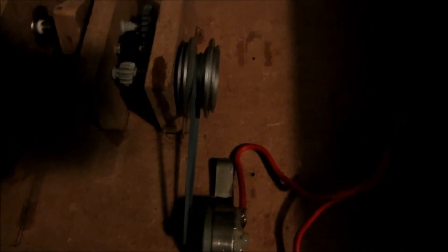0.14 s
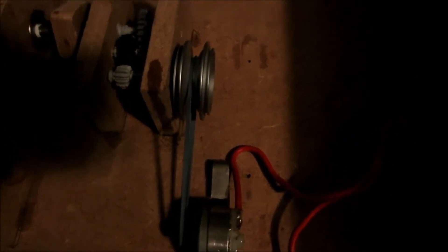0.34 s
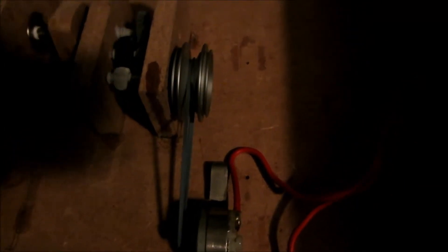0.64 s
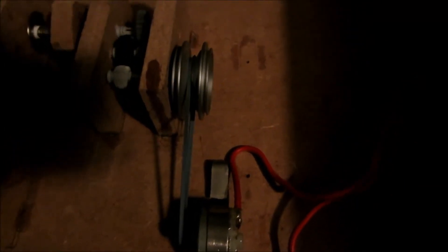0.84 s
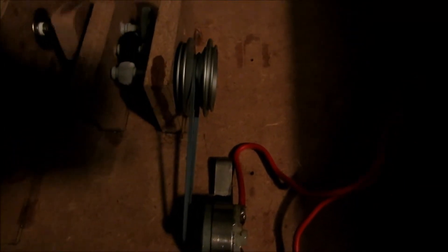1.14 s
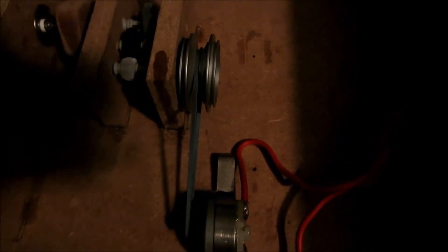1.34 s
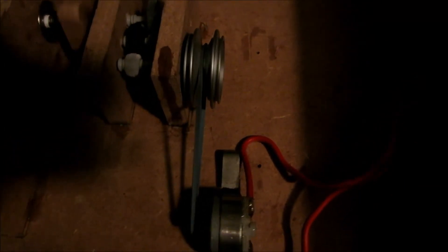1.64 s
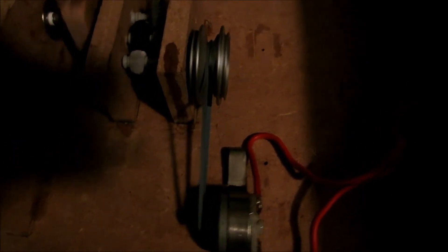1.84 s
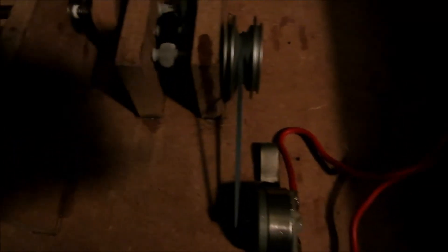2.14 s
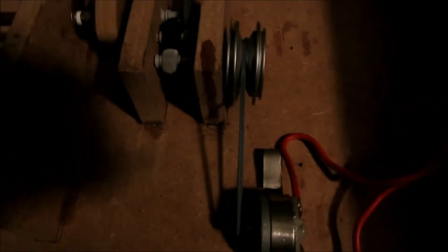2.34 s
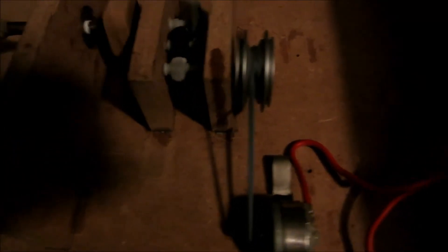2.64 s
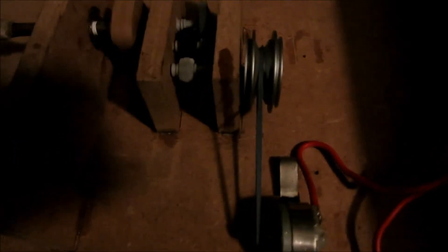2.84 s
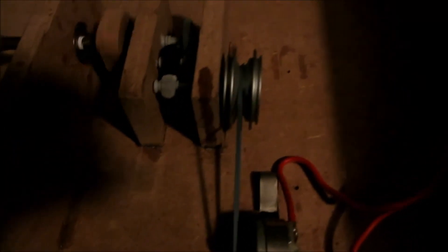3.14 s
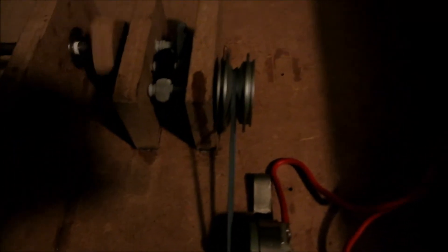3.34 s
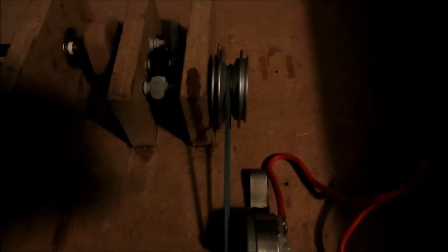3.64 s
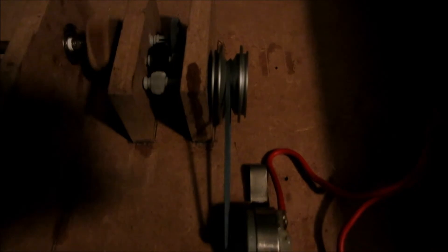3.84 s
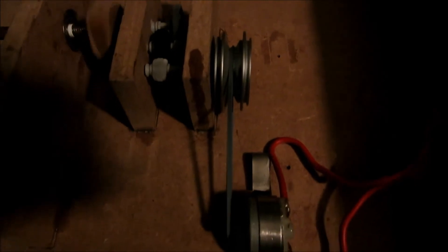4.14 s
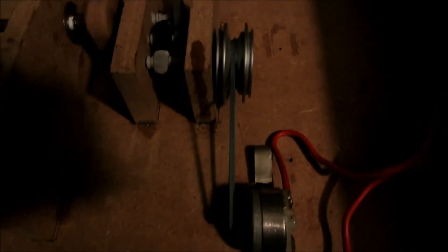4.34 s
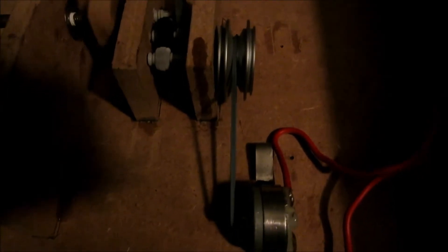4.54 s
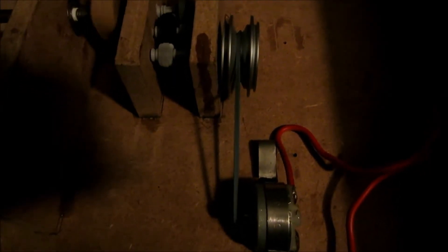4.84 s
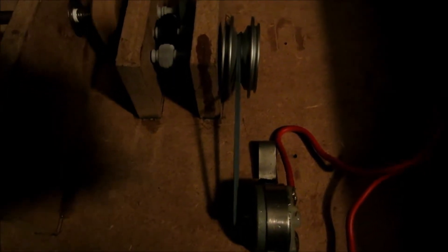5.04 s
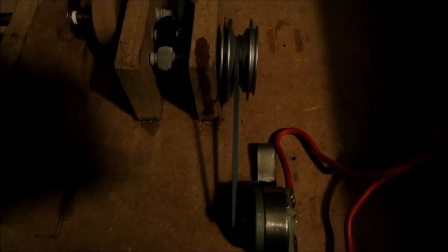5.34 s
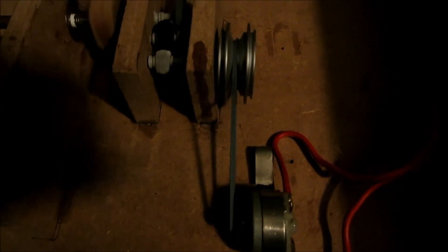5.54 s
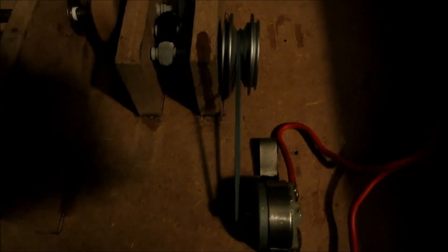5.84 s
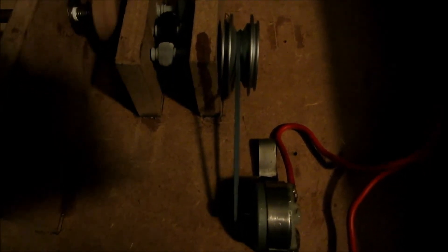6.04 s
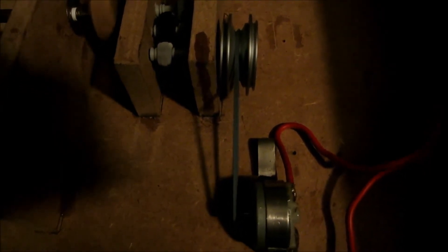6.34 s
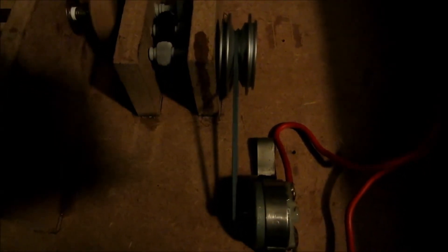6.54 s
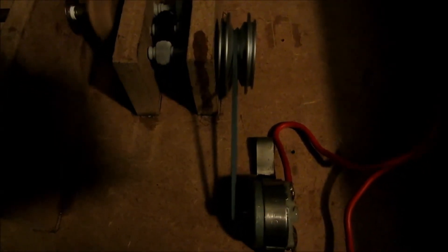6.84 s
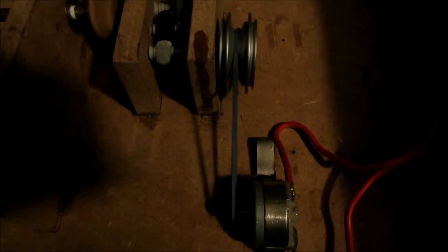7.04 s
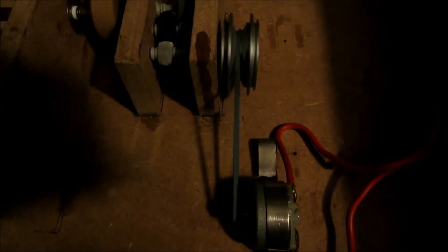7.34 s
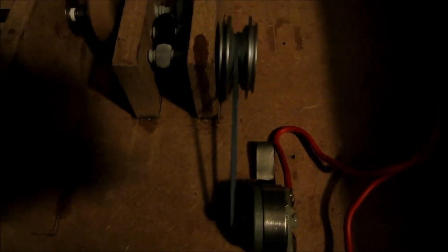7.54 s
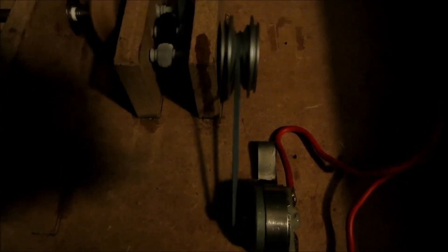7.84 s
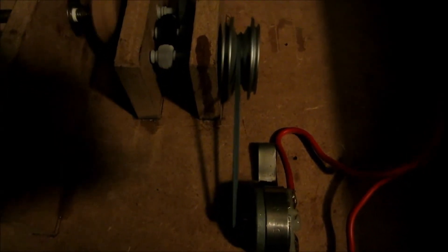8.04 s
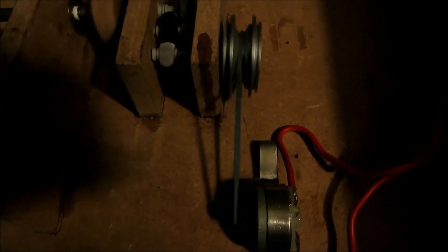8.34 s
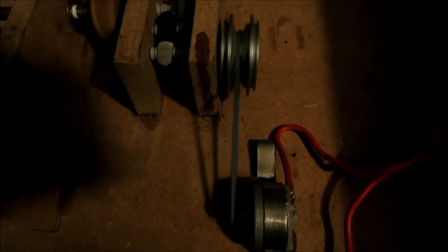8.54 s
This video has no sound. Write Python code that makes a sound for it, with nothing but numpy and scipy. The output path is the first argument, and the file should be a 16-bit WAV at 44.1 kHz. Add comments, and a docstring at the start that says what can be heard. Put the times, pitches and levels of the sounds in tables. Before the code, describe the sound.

In a quiet room with faint hiss, a switch clicks softly and a dull bump follows. A small motor takes up with quick separate ticks that merge into chatter, and balls in a turning jar begin tumbling on a wooden board. The clatter swells once per turn, growing faster and louder, with heavy knocks, bright metallic rattle and a thin sliding squeal. Close microphones, small dry room; it ends still running.

```python
"""A rough, thickening tumble with hard ticks, a squeal sliding down to near 6.3 kHz and a whine near 3 kHz:
a small home-built ball mill starts up on a wooden board in a quiet room.
Random impacts of the balls excite the short modes of the board; tiny metal contacts give the bright rattle.
The drive squeals as a near sine with side lines and an octave, and the motor whines in high multiples.
A hum through low resonances, a rumble, a thin steady tone and a faint room hiss lie below."""
import sys
import numpy as np
from scipy import signal
from scipy.fft import rfft, irfft, next_fast_len
from scipy.io import wavfile

SR = 44100
rng = np.random.default_rng(int(sys.argv[2]) if len(sys.argv) > 2 else 0)


def file_out(sig):
    """Save sig as 16-bit WAV at sys.argv[1]."""
    # one column per channel
    cols = np.atleast_2d(sig).T
    # limit, then scale
    lim = np.clip(cols, -1, 1)
    pcm = np.round(lim * 32767).astype(np.int16)
    wavfile.write(sys.argv[1], SR, pcm)


N = 383229

# rotation of the jar, slowing a little before it speeds up: start_s, turns_per_s
SPEED = [(.8, 1.89), (2, 1.285), (3, 2.263), (4, 2.941), (5, 3.725), (6, 4.327), (7, 5.048), (8.69, 5.6)]
# modes of the frame and board, low, middle and high: pitch_hz, width_hz, level_db
LOW_MODES = [(507, 96, -15), (603, 33, -0.5), (700.7, 60.4, -8), (850, 45, -5)]
MID_MODES = [(1024, 58.3, -2), (1087, 38.5, -2), (1162, 98, -5), (1324, 76.6, -1.5), (1410, 43, -4.5),
             (1567.5, 34.6, -5)]
HIGH_MODES = [(1763, 105, -4.5), (1945, 170, -9), (2200, 70, -11), (2394, 163, -16.5), (2665, 69, -13),
              (2907, 216, -19.5), (3300, 91, -24), (3420, 62, -25), (4280, 210, -51)]


def tumbling():
    """Modal excitation: random ball impacts shake the board, and each mode swells as the impact point wanders."""
    # level of the tumbling before the swell of each turn: start_s, level_db, low_modes_above_that_db
    tumble_levels = [(.53, -76, 1), (.55, -58, -17), (.6, -52, -7), (.75, -45, 1.5), (.85, -38.5, 0),
                     (1.1, -31.5, -2), (1.44, -26.5, 1), (1.62, -29, -0.5), (2.01, -24.5, 0.5),
                     (2.4, -27, 0.5), (2.6, -23.5, 0.5), (3.1, -23.5, 0.5), (3.44, -22, -0.5),
                     (4.17, -20, 0), (4.7, -21.5, 1), (5.39, -20, 1), (5.8, -20, 1), (6.17, -23, 1),
                     (7.01, -19.5, -1), (8.69, -19.5, -3)]
    impacts_per_turn = 370
    level_db, low_db = in_time(tumble_levels)
    per_s = impacts_per_turn * in_time(SPEED)[0]
    # dividing by the root of the rate keeps the power even
    drive = impacts(per_s, spread_db=2.5) / np.sqrt(per_s) * from_db(0.24 * drift(60))
    low = from_db(low_db) * shaken(LOW_MODES, drive, patchy_db=1.0)
    middle = from_db(1.55 * drift(9)) * shaken(MID_MODES, drive, patchy_db=-0.15)
    high_db = -5 + 0.65 * swell_db()
    high = from_db(high_db) * shaken(HIGH_MODES, drive, patchy_db=2.5)
    return from_db(level_db + 0.2 * swell_db()) * (low + middle + high)


def knocks():
    """Selective excitation: each heavy fall strikes hardest the modes near its own pitch."""
    # the heaviest falls of the charge: start_s, nominal_peak_db, hardest_struck_pitch_hz
    falls = [(1.34, -6.5, 1060), (1.394, -13, 1030), (1.416, -7.5, 1780), (1.546, -12, 860),
             (1.654, -12, 1327), (1.914, -16, 1340), (2.041, -7.5, 1830), (2.639, -5.5, 1306),
             (3.152, -2.5, 603), (3.507, -8, 1316), (3.891, -4.5, 1398), (4, -12, 556), (4.094, -5.5, 590),
             (4.511, -4, 620), (4.669, -5, 1048), (4.95, -8.5, 983), (5.07, -9, 1380), (5.228, -8, 1060),
             (5.615, -5, 601.5), (5.85, -7, 615), (6.31, -8, 604), (6.741, -5, 596), (7.025, -4.5, 590)]
    start_s, peak_db, centre_hz = np.transpose(falls)
    out = 0
    for k, (hz, width, db) in enumerate(LOW_MODES + MID_MODES + HIGH_MODES):
        octaves_away = np.abs(np.log2(hz / centre_hz))
        chance_db = rng.normal(0, 2, len(start_s))
        strength_db = peak_db - 3 + .1 * db - 14 * octaves_away + chance_db
        sense = (-1) ** k  # neighbours swing in opposite sense
        out = out + sense * ring(struck(start_s, strength_db), hz, width * 1.5)
    return contact(out, 3500)


def rattle():
    """Shot noise: dense tiny metal contacts with a bright spectrum ring near 6 kHz, with hard ticks on top."""
    # bright rattle before the swell of each turn: start_s, level_db
    rattle_levels = [(.5, -62), (.82, -48), (.93, -45.5), (2.16, -43.5), (4.08, -39.5), (5.56, -39),
                     (6.2, -42), (7.3, -38.5), (8.69, -38.5)]
    # spectrum of the contacts: pitch_hz, density_db_per_hz
    rattle_colour = [(2240, -1), (3800, -1.5), (4560, -10), (5130, -4.5), (5480, -6.5), (5780, -4.5),
                     (6130, 5), (7020, -2.5), (8040, -7.5), (9880, -2.5), (10400, -4.5), (11500, -12),
                     (12400, -11.5), (14300, -20), (15600, -17)]
    # metal parts that ring in the rattle: pitch_hz, width_hz, level_db before the growth with speed
    metal_modes = [(6000, 200, -32.5), (6180, 190, -38.5)]
    level_db, = in_time(rattle_levels)
    grains = impacts(per_s=4600, spread_db=3) * from_db(1.36 * drift(60))
    bright = rms_one(colour(grains, rattle_colour))
    rings = sum(from_db(db) * ring(grains, hz, width) for hz, width, db in metal_modes)
    # the ring grows by 1.6 dB per turn per s and swells more than the bright part
    rings = rings * from_db(1.6 * in_time(SPEED)[0] + 1.2 * swell_db())
    started = np.arange(N) > rattle_levels[0][0] * SR
    return started * from_db(level_db + 0.9 * swell_db()) * (bright + rings) + ticks()


def ticks():
    """Impulse response: single hard contacts set a 6.4 kHz ring and broad treble modes sounding."""
    # the hardest single ticks: start_s, nominal_peak_db, ring_above_that_db
    hard_ticks = [(.582, -38, -12), (.663, -42, -5), (.7063, -39, -6), (.809, -36, -10), (.8261, -30, -14),
                  (.9847, -34, -8), (1.0052, -33, -11), (1.547, -38, -4), (1.655, -35, 8),
                  (2.1571, -32, -7), (2.7163, -34, -7), (3.493, -32, 6), (3.8828, -32, 6), (4.2187, -29, 5),
                  (4.5108, -31, 5), (4.599, -32, -15), (4.7881, -33, -7), (4.8775, -30, -12),
                  (5.0689, -31, 3), (5.3413, -32, 8), (5.421, -26.5, -12), (5.5894, -32, 4),
                  (5.6646, -27, -12), (5.704, -34, 10), (5.8246, -32, -3), (5.8985, -32, -14),
                  (6.0575, -33, 2), (6.3298, -31, -13), (6.566, -31, 0), (6.76, -30, -14), (7.1253, -33, 1)]
    # treble modes of a tick: pitch_hz, width_hz, level_db
    tick_modes = [(9070, 420, 8), (10300, 210, 1.5), (11000, 900, 6), (13300, 1500, -11)]
    start_s, peak_db, ring_db = np.transpose(hard_ticks + weak_ticks())
    out = ring(struck(start_s, peak_db + ring_db), 6430, 230)
    for k, (hz, width, db) in enumerate(tick_modes):
        strength_db = peak_db + db - 4 + rng.normal(0, 1.5, len(start_s))
        out += (-1) ** k * ring(struck(start_s, strength_db), hz, width)
    band = signal.butter(2, [5000, 15000], "band", fs=SR, output="sos")
    return signal.sosfilt(band, out)


def weak_ticks():
    """Random point process: weaker ticks come mostly in the spill, and more often the faster the jar turns."""
    ticks_per_turn, from_s = 6, 3  # the rate before the swell of each turn
    t = np.arange(N) / SR
    per_s = ticks_per_turn * in_time(SPEED)[0] * from_db(2.5 * swell_db()) * (t > from_s)
    hit = rng.random(N) < per_s / SR
    size, tone = rng.standard_normal((2, N))[:, hit]
    peak_db = -39.5 + 2.2 * size
    ring_db = -4 + 6 * tone
    return list(zip(t[hit], peak_db, ring_db))


def take_up():
    """Transient excitation: contacts of the drive ring the motor mount, then merge into a chatter."""
    # first separate contacts of the drive as it takes up: start_s, strike_db
    lone_contacts = [(0.554, -38), (0.583, -35), (.613, -36), (.639, -36), (0.6643, -28.5), (0.6705, -38),
                     (.6884, -41), (0.707, -29), (.7274, -33), (0.744, -30), (.7672, -32), (.811, -29),
                     (0.827, -29), (0.901, -27), (.985, -26.5), (1.0065, -24)]
    # the chatter they merge into: start_s, contacts_per_s (nominal), level_db
    chatter = [(.66, 102, -48), (.75, 139, -32.5), (1, 175, -29), (1.6, 201, -30.5), (2.5, 205, -26.5),
               (8.69, 205, -32)]
    lone = mount(struck(*np.transpose(lone_contacts)))
    per_s, level_db = in_time(chatter)
    count = np.cumsum(per_s * from_db(2.5 * drift(90))) / SR  # uneven spacing
    sizes = from_db(1.8 * rng.standard_normal(N))
    train = np.diff(np.floor(count), prepend=0) * sizes
    started = np.arange(N) > chatter[0][0] * SR
    return lone + started * from_db(level_db) * rms_one(mount(train)) + switch_click()


def switch_click():
    """Structure-borne sound: the switch clicks softly through the board modes before the start."""
    # two contacts of the switch: start_s, strike_db
    switch_contacts = [(0.161, -29), (0.166, -33)]
    clicks = struck(*np.transpose(switch_contacts))
    board = sum(from_db(db - 14.0) * ring(clicks, hz, width * 1.7)
                for hz, width, db in LOW_MODES + MID_MODES)
    return contact(board, 2500)


def mount(clicks):
    """Cascaded resonance: the mount is shaken through a second, like one, so each ring swells before it dies."""
    # modes of the motor mount: pitch_hz, width_hz (of each of the two resonances), level_db
    mount_modes = [(1376.6, 60, -1), (1463, 127, 4.5), (1948, 110, -9.5), (3023, 71, -17),
                   (3250, 88, -14.5)]
    out = 0
    for hz, width, db in mount_modes:
        swelling = ring(ring(clicks, hz, width), hz, width)
        # this factor brings the swollen peak back to about 1
        out = out + from_db(db) * swelling * 2 * np.pi * np.e * width / SR
    return out


def strands():
    """Resonant filtering: noise in three narrow treble bands gives a faint hiss free of the turns' swell."""
    # faint bands of hiss from the drive: pitch_hz, width_hz, level_db
    strand_modes = [(10900, 300, -4), (12100, 250, -4), (13550, 200, -6)]
    # their common level: start_s, level_db
    strand_levels = [(.5, -95), (1, -62), (2.5, -52), (4.1, -53), (4.8, -57), (8.69, -57)]
    noise = rng.standard_normal(N)
    return from_db(in_time(strand_levels)[0]) * shaken(strand_modes, noise, patchy_db=0.5)


def squeal():
    """Modulation: a near sine slides and jumps, with side lines one wobble away and an octave."""
    # the main line: start_s, pitch_hz, level_db
    squeal_path = [(0, 7160, -60), (.13, 6880, -61), (.15, 7250, -57), (.3, 7050, -60), (.34, 7300, -65),
                   (.45, 7165, -49), (.505, 7170, -45), (.515, 6700, -54), (.565, 6700, -52),
                   (.58, 6600, -47), (.69, 6400, -56), (.73, 6500, -50), (.815, 6550, -50),
                   (.825, 6900, -46), (.848, 6940, -52), (.858, 6420, -49), (.895, 6480, -50),
                   (.92, 6790, -57), (1.08, 6730, -52), (1.1, 6650, -54), (1.28, 6520, -58),
                   (1.3, 6650, -50), (1.41, 6620, -42), (1.43, 6504, -46), (1.55, 6470, -44),
                   (1.59, 6370, -50), (1.73, 6350, -60), (1.77, 6310, -48), (1.98, 6320, -44),
                   (2.01, 6430, -46), (2.2, 6475, -41), (2.55, 6460, -44), (2.62, 6420, -45),
                   (2.98, 6390, -52), (3.07, 6310, -42), (3.22, 6270, -40.5), (3.35, 6226, -48),
                   (3.5, 6275, -44), (3.6, 6260, -56), (3.66, 6230, -75), (4.49, 6346, -75),
                   (4.52, 6400, -48), (4.76, 6390, -49), (4.79, 6260, -50), (5.15, 6290, -46),
                   (5.3, 6200, -77)]
    # lines one wobble above and below: start_s, upper_level_db, lower_level_db
    side_lines = [(.89, -80, -80), (.92, -51, -70), (1.25, -45.5, -74), (1.5, -64, -58), (1.73, -62, -51),
                  (1.8, -70, -73), (2.05, -51, -59), (2.55, -66, -52), (2.98, -62, -45.5), (3.1, -66, -52),
                  (3.2, -80, -80)]
    # octave of the squeal: start_s, level_db
    octave_levels = [(0, -79), (.5, -70), (.7, -57), (1.4, -59), (1.6, -55), (3, -56), (3.6, -56),
                     (3.75, -85)]
    wobble_hz = 152  # mean, about which it drifts
    hz, level_db = in_time(squeal_path)
    upper_db, lower_db = in_time(side_lines)
    phase = 2 * np.pi * np.cumsum(hz + 8 * drift(100)) / SR
    wobble = 2 * np.pi * np.cumsum(wobble_hz + 8 * drift(3.3)) / SR
    tone = from_db(level_db) * np.sin(phase)
    tone += from_db(upper_db) * np.sin(phase + wobble)
    tone += from_db(lower_db) * np.sin(phase - wobble)
    octave_db = in_time(octave_levels)[0] + 4.5 * drift(20)
    octave = from_db(octave_db) * np.sin(2 * phase + .5 * drift(150)) * (1 + .4 * np.cos(wobble))
    # root 2 turns rms levels into sine amplitudes
    return np.sqrt(2) * from_db(1.8 * drift(40)) * (tone + octave)


def whine():
    """Harmonic series: three high multiples of the motor's pulse rate come and go, each on its own."""
    # multiples of the pulse rate: multiple, level_db
    orders = [(9.0, -3), (10.0, 0), (11.0, -1)]
    # level of the whine: start_s, level_db
    whine_levels = [(1.2, -95), (1.6, -49), (3.4, -45), (6.1, -47), (6.5, -95)]
    pulse_hz, lift_hz = 294, 20  # the motor runs faster as the spill unloads it
    hz = pulse_hz + lift_hz * np.cos(np.pi * turns()) ** 4 + 3.5 * drift(14) + 1.5 * drift(60)
    phase = 2 * np.pi * np.cumsum(hz) / SR
    lines = sum(from_db(db + 4.5 * drift(16)) * np.sin(k * phase) for k, db in orders)
    return from_db(in_time(whine_levels)[0]) * lines


def turns():
    """Angular kinematics: the integral of speed counts the jar's turns since the first spill."""
    first_spill_s = .83
    count = np.cumsum(in_time(SPEED)[0]) / SR
    return count - count[int(first_spill_s * SR)]


def swell_db():
    """Periodic modulation: the charge spills once a turn, a smooth hump in dB centred on zero."""
    height_db = .8 * in_time(SPEED)[0]  # trough to crest, more at speed
    return height_db * np.cos(2 * np.pi * turns()) / 2


def two_ports(x):
    """Radiation and diffraction: a small board sends out little bass, one body shades, echoes come opposite."""
    # the body shades the left port: pitch_hz, left_minus_right_db
    shadow = [(300, 0), (1200, 0.5), (2500, 2.5), (5000, -1.5), (7500, 0.5), (9800, -7), (15000, -8)]
    # share of the room's echo: pitch_hz, level_db
    echo_share = [(300, -18.5), (1000, -11.5), (4000, -24.5), (7000, -21), (10000, -1.5), (12500, 2.5),
                  (15000, -6)]
    echo_t60_s = .3
    x = signal.sosfilt(signal.butter(6, 376, "high", fs=SR, output="sos"), x)
    left_half = [(hz, db / 2) for hz, db in shadow]
    right_half = [(hz, -db) for hz, db in left_half]
    t = np.arange(int(echo_t60_s * SR)) / SR
    decay = from_db(-60 * t / echo_t60_s)
    tail = rms_one(rng.standard_normal(len(t)) * decay) / np.sqrt(len(t))
    echo = colour(signal.fftconvolve(x, tail)[:N], echo_share)
    return np.array([colour(x + echo, left_half), colour(x - echo, right_half)])


def motor_hum():
    """Forced vibration: noise through low resonances makes the motor hum, its undertone and a board drone."""
    # motor hum in the board: start_s, level_db
    hum_levels = [(0, -74.5), (1.19, -62), (2.5, -55.5), (3.9, -57), (4.1, -63), (4.2, -53.5),
                  (5.61, -59.5), (5.76, -67), (7.3, -57.5), (8.69, -62.5)]
    # its resonances: pitch_hz, width_hz, level_db
    hum_modes = [(138.6, 10.3, 7), (193, 28, -6)]
    # the lowest hum: start_s, level_db
    undertone_levels = [(0, -75.5), (1.2, -66), (2.7, -69), (5.3, -81), (7, -62.5), (8.69, -57)]
    # the deepest board modes: start_s, level_db
    drone_levels = [(0, -84), (1.2, -54.5), (3.5, -44.5), (5.5, -48.5), (8.69, -49)]
    undertone_modes = [(111.4, 6.3, 0)]  # pitch_hz, width_hz, level_db, as in the next line
    drone_modes = [(284, 49, -10.0), (320.3, 14.8, 1.5), (439, 29.5, 1.5)]
    out = 0
    for levels, modes, patchy_db in [(hum_levels, hum_modes, 1.5), (undertone_levels, undertone_modes, 8.5),
                                     (drone_levels, drone_modes, 3.0)]:
        out = out + from_db(in_time(levels)[0]) * shaken(modes, rng.standard_normal(N), patchy_db)
    return out


def bump():
    """Damped oscillation: one rounded blow gives a soft bump before the start."""
    # the blow and its mode: start_s, strike_db, pitch_hz, width_hz
    thump = (.418, -40, 240, 120)
    start_s, strike_db, hz, width = thump
    return contact(ring(struck([start_s], [strike_db]), hz, width), 500)


def room_hiss():
    """Stereo correlation: coloured noise, mostly opposite in the two ports, makes the hiss of the room."""
    # spectrum of the hiss: pitch_hz, density_db_per_hz
    hiss_colour = [(47, -39), (80, -7), (263, -1.5), (570, -5), (665, 4), (905, -3), (1380, 2.5), (1540, 1),
                   (7360, -12.5), (14600, -16.5), (15600, -21)]
    mid, side = colour(rng.standard_normal((2, N)), hiss_colour)
    return from_db(-45.5) * rms_one(from_db(-9) * mid + side * np.array([[1], [-1]]))


def rumble():
    """Flow noise: air moving at the ports gives an independent 18 to 50 Hz noise in each."""
    # level of the rumble: start_s, level_db
    rumble_levels = [(0, -58), (3.56, -59), (4.55, -68), (7.5, -78), (8.69, -72)]
    band = signal.butter(2, [18, 50], "band", fs=SR, output="sos")
    air = signal.sosfilt(band, rng.standard_normal((2, N)))
    return from_db(in_time(rumble_levels)[0]) * rms_one(air)


def pilot():
    """Pure tone: a thin steady electrical sine at 15734 Hz, 6 dB stronger on the right."""
    tone = np.sin(2 * np.pi * 15734 * np.arange(N) / SR)
    return tone * from_db([[-71], [-65]])


def background():
    """Superposition: hiss, rumble, hum, bump and thin tone add linearly."""
    return room_hiss() + rumble() + motor_hum() + bump() + pilot()


def from_db(db):
    """Logarithmic level: the amplitude gain of a level in dB."""
    return 10 ** (np.asarray(db) / 20)


def rms_one(x):
    """Normalization: scale to an rms of 1."""
    return x / np.sqrt(np.mean(x ** 2) + 1e-20)


def in_time(rows):
    """Linear interpolation: the columns of a curve, one value per sample."""
    s, *columns = np.transpose(rows)
    return [np.interp(np.arange(N) / SR, s, c) for c in columns]


def colour(x, points):
    """Spectral shaping: filter by dB points joined along a logarithmic frequency axis."""
    size = next_fast_len(N)
    hz, db = np.transpose(points)
    grid = np.maximum(np.arange(size // 2 + 1) * SR / size, 1)
    gain = from_db(np.interp(np.log(grid), np.log(hz), db))
    return irfft(rfft(x, size) * gain, size)[..., :N]


def drift(rate):
    """Slow random variation: normal values of spread 1, drawn rate times a second and joined by lines."""
    steps = rng.standard_normal(int(rate * N / SR) + 2)
    return np.interp(np.arange(N) * rate / SR, np.arange(len(steps)), steps)


def ring(x, hz, width):
    """Damped resonance: a unit click sets a decaying sine of initial height 1 ringing."""
    r, w = np.exp(-np.pi * width / SR), 2 * np.pi * hz / SR
    return signal.lfilter([0, np.sin(w)], [1, -2 * r * np.cos(w), r * r], x + 1e-18)


def impacts(per_s, spread_db):
    """Poisson-like impulses: random clicks of either sign, most small and a few large."""
    size_db = spread_db * np.minimum(rng.exponential(1, N), 5)
    sizes = from_db(size_db) * rng.choice([-1, 1], N)
    return sizes * (rng.random(N) < per_s / SR)


def struck(times, db):
    """Impulse train: clicks at given times in seconds and levels in dB."""
    clicks = np.zeros(N)
    np.add.at(clicks, np.round(np.asarray(times) * SR).astype(int), from_db(db))
    return clicks


def shaken(modes, drive, patchy_db):
    """Modal synthesis: a drive through modes whose level is the height of the spectral peak; rms 1."""
    out = 0
    for k, (hz, width, db) in enumerate(modes):
        gain = from_db(db + patchy_db * drift(24)) * width * (-1) ** k
        out = out + ring(gain * drive, hz, width)
    return rms_one(out)


def contact(clicks, hz):
    """Finite contact time: a second-order low-pass rounds the blow."""
    return signal.sosfilt(signal.butter(2, hz, fs=SR, output="sos"), clicks)


def scene():
    """Superposition: the mill heard through two ports over the background."""
    mill = tumbling() + knocks() + take_up() + rattle() + strands() + squeal() + whine()
    return two_ports(mill) + background()


def record(dry):
    """Saturation and band limiting: the highest peaks are gently rounded and the top is cut."""
    rounded = dry / (1 + (dry / 1.3) ** 4) ** (1 / 4)
    top_cut = signal.ellip(12, .3, 80, 15770, fs=SR, output="sos")
    return signal.sosfilt(top_cut, rounded)


dry = scene()
out = record(dry)
file_out(out)
```